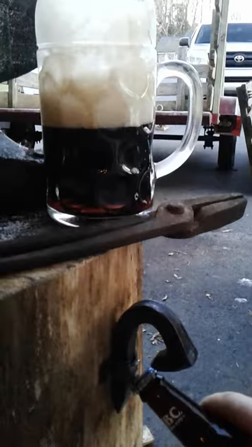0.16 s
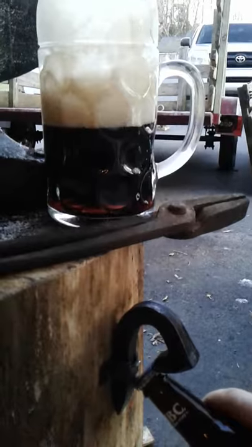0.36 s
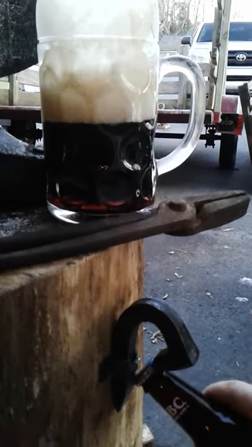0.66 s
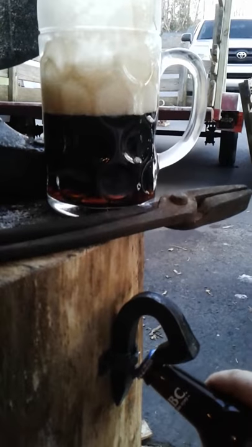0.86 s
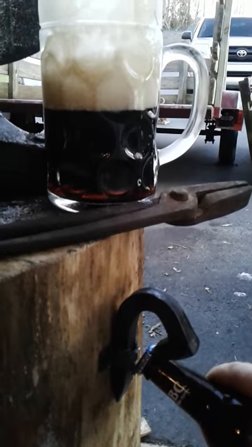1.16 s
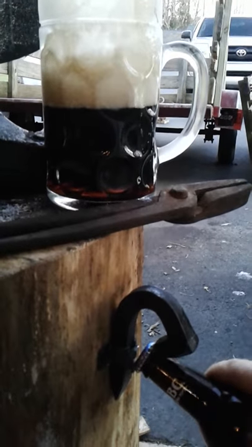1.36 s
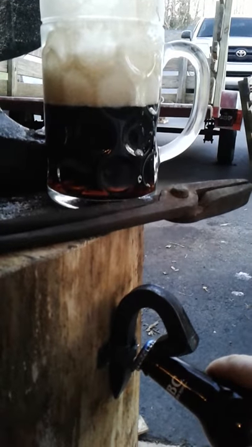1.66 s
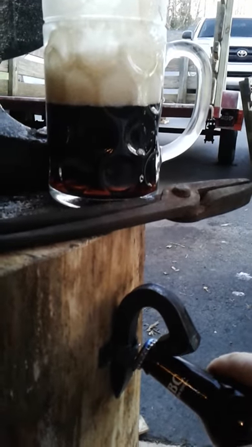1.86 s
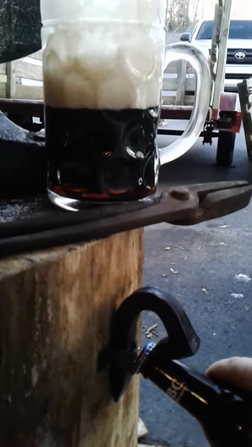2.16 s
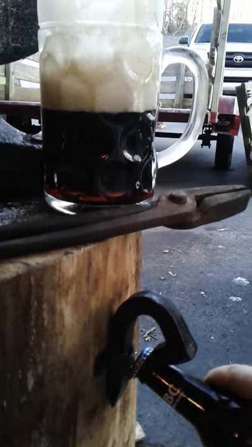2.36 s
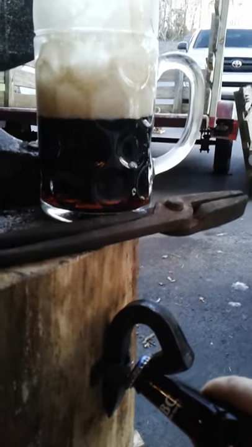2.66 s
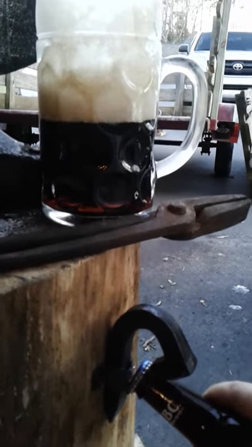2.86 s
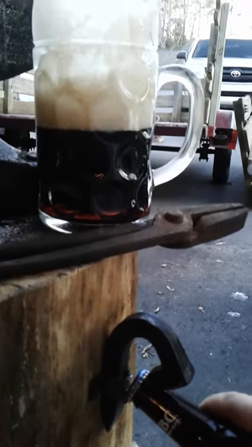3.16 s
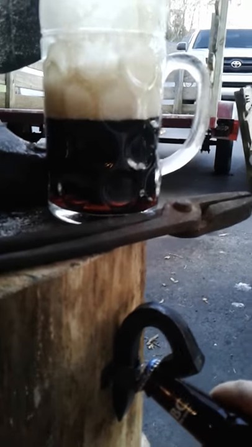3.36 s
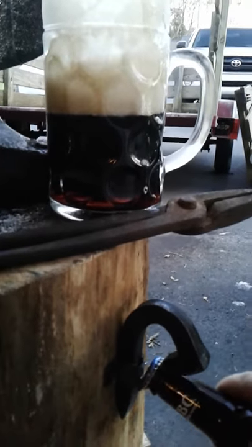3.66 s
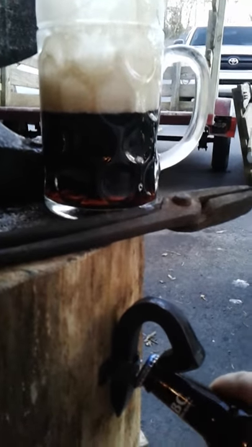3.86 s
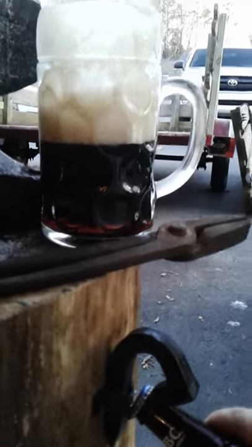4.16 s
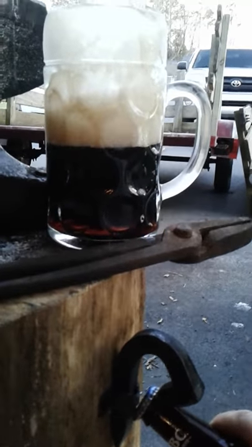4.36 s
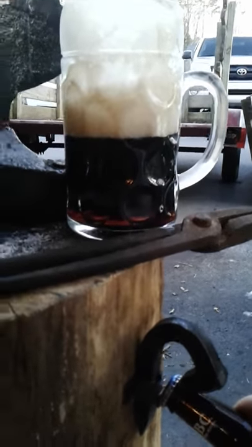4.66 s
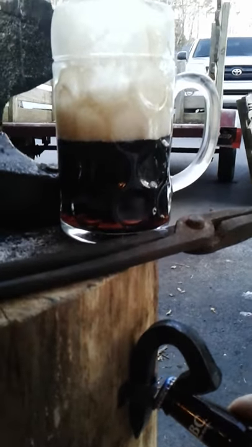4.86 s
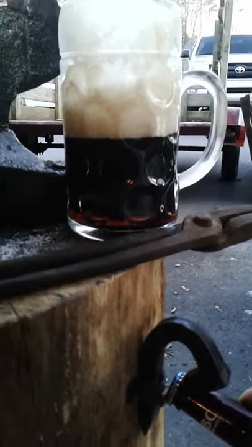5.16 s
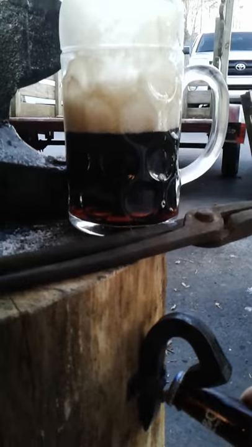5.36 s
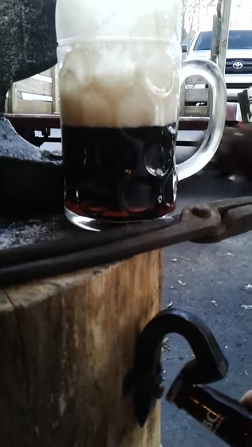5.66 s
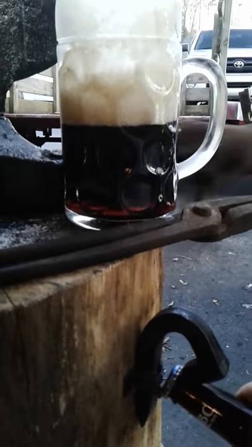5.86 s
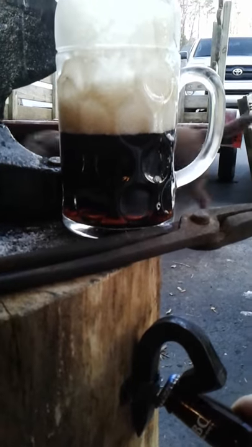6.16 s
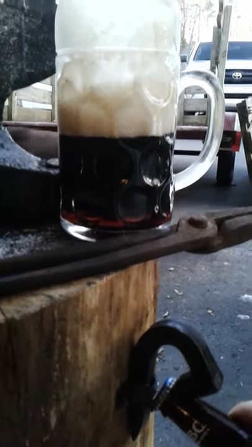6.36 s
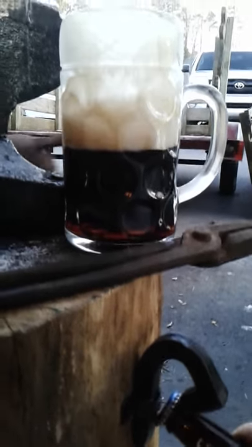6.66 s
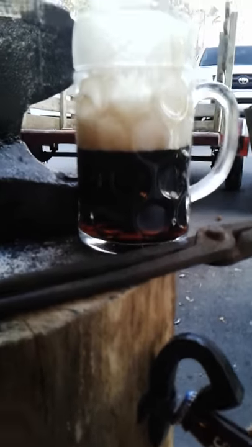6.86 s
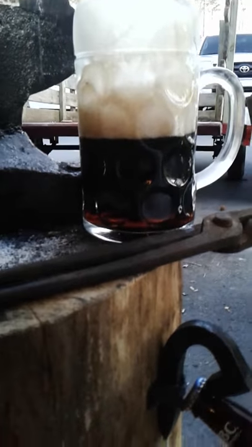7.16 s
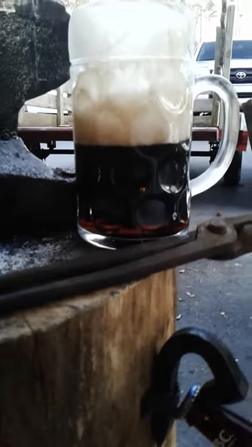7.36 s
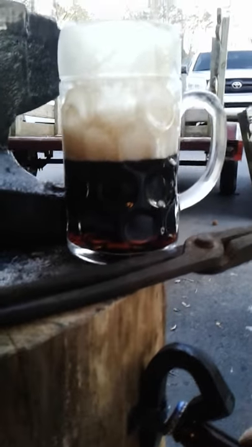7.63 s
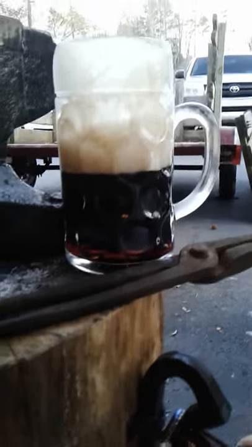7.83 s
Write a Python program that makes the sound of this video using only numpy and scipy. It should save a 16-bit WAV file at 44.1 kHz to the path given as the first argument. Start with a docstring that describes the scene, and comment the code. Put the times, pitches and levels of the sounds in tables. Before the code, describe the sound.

Close outdoor sound of a glass bottle being levered in a forged iron hook on a wooden post. Faint squeaks come first, then a bright clink, rough scraping and metal crunching with a woody shudder. Gas spits out in two sharp hisses, a cluster of clinks follows, and the cap lets go with a strong short pop and fading fizz over a quiet distant rumble.

```python
"""A crown cap is slowly levered off a glass bottle in a forged iron opener on a wooden post, outdoors.
Knocks of the bottle are gliding clinks, ringing iron and cap modes and a slow post; drags and crunches
are runs of tiny slips. The seal squeaks in wavering tones, gas escapes as shaped noise with two strong
spurts, and the cap lets go in a falling puff with a crack and hiss. Echoes, rumble and a rush lie behind."""
import sys
import numpy as np
from scipy import signal
from scipy.fft import rfft, irfft, next_fast_len
from scipy.io import wavfile

SR = 44100
rng = np.random.default_rng(int(sys.argv[2]) if len(sys.argv) > 2 else 0)


def store_wav(level_fs):
    """Save 16-bit WAV to argv[1]."""
    pcm = np.round(np.clip(np.atleast_2d(level_fs), -1, 1) * 32767)
    wavfile.write(sys.argv[1], SR, pcm.T.astype(np.int16))


N = 352473
TIME = np.arange(N) / SR
AGE = TIME[:SR]   # time since a blow, for one second


def from_db(db):
    """Decibels to gain."""
    return 10 ** (np.asarray(db) / 20)


def rms_one(x):
    """Scale to unit rms."""
    return x / np.sqrt(np.mean(x ** 2) + 1e-20)


def level(rows, axis=1):
    """Gain over time from a dB column; silent outside its rows."""
    rows = np.array(rows)
    return from_db(np.interp(TIME, rows[:, 0], rows[:, axis], left=-180, right=-180))


def dying(t60):
    """Exponential decay that loses 60 dB in t60 seconds."""
    return from_db(-60 * AGE / max(t60, .001))


def rising(time_s):
    """Soft onset with the given time constant in seconds."""
    return 1 - np.exp(-AGE / time_s)


def add(track, s, sound):
    """Mix a sound into a track from time s."""
    at = max(round(s * SR), 0)
    track[at:at + len(sound)] += sound[:N - at]


def coloured(x, colour):
    """Give a signal a spectrum that falls 24 dB per octave beyond its ends; rms 1."""
    hz, db = np.transpose(colour)
    octave = np.log2(np.maximum(np.fft.rfftfreq(len(x), 1 / SR), 1))
    outside = np.abs(octave - np.clip(octave, np.log2(hz[0]), np.log2(hz[-1])))
    gain_db = np.interp(octave, np.log2(hz), db) - 24 * outside
    return rms_one(irfft(rfft(x) * from_db(gain_db), len(x)))


def noise(colour, size=N):
    """Smooth noise of a given spectrum."""
    return coloured(rng.standard_normal(next_fast_len(size)), colour)[:size]


def flicker(rate, size=N):
    """Random wander through normally distributed points, rate of them per second."""
    knots = rng.standard_normal(size // 8)
    return np.interp(TIME[:size] * rate, np.arange(len(knots)), knots)


def slips(rate, size_db):
    """One second of tiny slips at random times and of random size."""
    happens = rng.random(SR) < rate / SR
    size = from_db(size_db * np.clip(rng.standard_normal(SR), -2, 2))
    return happens * rng.choice([-1, 1], SR) * size


def ringing(modes, scatter_db, detune):
    """Struck modes; the point of contact and the grip change their strength and pitch on every blow."""
    out = np.zeros(SR)
    for hz, db, t60 in modes:
        strength, shift, side = rng.uniform(-1, 1, 3)
        tone = np.sin(2 * np.pi * hz * (1 + detune * shift) * AGE)
        out += np.sign(side) * from_db(db + scatter_db * strength) * dying(t60) * tone
    return out


# bottle against the opener, levels before the layer trims:
# start_s [s], strength_db [dB], hardness [0-1], post_db [dB], clink_hz [Hz]
BOTTLE_KNOCKS = [(0.4811, -41, 0, -53.5, 1920), (0.527, -47, 0, -59, 1850), (1.886, -26, 0.83, -44, 2075),
                 (1.992, -38, 0.3, -49, 1840), (2.092, -43.5, 0, -48, 1930), (2.1982, -49, 0.99, -71, 1770),
                 (3.727, -42, 0.64, -43, 2094), (3.855, -48, .2, -63, 2330), (4.632, -56, 0.77, -60, 2070),
                 (4.667, -37.5, 1, -45, 2060), (4.851, -31, 1, -38.5, 2046), (4.882, -40, 0.2, -39.5, 2080),
                 (4.9576, -24, 0.85, -40.5, 2057), (5.049, -36.5, 0.69, -44.5, 1950),
                 (5.166, -42.5, 0.64, -46, 1890), (5.245, -28.5, 1, -42.5, 1995),
                 (5.414, -54, 0.2, -52, 1830), (5.674, -44.5, 0.5, -37.5, 2020), (5.782, -50, 0, -57, 2190),
                 (5.907, -43, .6, -38.5, 2040), (5.978, -25.5, 0.97, -40.5, 2044),
                 (6.114, -44, 0.1, -47.5, 2060), (6.151, -41.5, 0.54, -76, 2066),
                 (6.629, -32.5, .1, -43, 2080), (6.691, -60, .1, -51, 2000), (7.45, -58.5, 0.42, -74, 2160)]
# modes of the forged iron hook: pitch_hz [Hz], level_db [dB], t60_s [s]
IRON_MODES = [(666, 2, .07), (753, -5, 0.087), (840, -6.5, 0.0327), (1002.5, -0.5, 0.097),
              (1094, -8.5, .06), (1273, -4, 0.17), (1416, -2, 0.099), (1594, 2.5, 0.063),
              (1860, -5, 0.0556), (1910, -10.5, .15), (2220, -20.5, .26), (2450, -17.5, 0.021)]
# modes of the thin steel cap: pitch_hz [Hz], level_db [dB], t60_s [s]
CAP_MODES = [(2640, 2.5, 0.0577), (3030, -2, 0.09), (3184, 2, 0.12), (3960, -2, .05), (4160, 2.5, 0.09),
             (4280, 0.5, 0.12), (4680, -3, 0.05), (4960, -5.5, 0.073), (5020, 0, 0.15), (5650, -7.5, .04),
             (6400, -3.5, 0.085)]
# the post's two slow resonances, thud then hum: pitch_hz [Hz], t60_s [s]
POST_RESONANCES = [(176, 0.11), (283, 0.14)]
# the post thuds while the bottle is wedged in the hook and hums when it sits loosely: (thud dB, hum dB)
WEDGED_FROM_S, WEDGED_UNTIL_S = 1.0, 5.2
WEDGED_DB, LOOSE_DB = (0, -6.5), (-10.5, -0.5)
# a soft contact clinks and ticks this much less than a hard one
SOFT_CLINK_LOSS_DB, SOFT_TICK_LOSS_DB = 33, 9
TICK_GROWTH = 1.42   # dB of edge tick per dB of strength
CLINK_BEND, CLINK_BEND_S = .04, .004   # the clink starts sharp by this share and settles


def knocks(hold_s=0.0076, damp_t60=0.069, clink_db=7.5, body_db=-13.5, thud_db=5.5, tick_db=-15.0,
           cap_db=-21.0, clack_db=-7.5, chatter_db=3.0, wobble_db=3.0, lowest_hz=110):
    """Each contact clinks until the grip damps it, rings the iron, thuds in the post and ticks at the cap's edge."""
    clack_colour = [(250, 7), (450, -11), (700, 10.5), (1700, 4.5), (2400, -6.0), (3600, -22.0)]
    edge_colour = [(3000, -10.5), (3600, -10.0), (4300, 0), (5800, -2.5), (6500, 0.5), (8600, 8.5),
                   (11000, -35.5), (15500, -17.5)]
    out = np.zeros(N)
    grip = np.minimum(1, from_db(-60 * (AGE - hold_s) / damp_t60))
    strongest = max(row[1] for row in BOTTLE_KNOCKS)
    for s, strength, hardness, post_db, hz in BOTTLE_KNOCKS:
        softness = 1 - hardness
        clink = strength + clink_db - SOFT_CLINK_LOSS_DB * softness
        tick = strongest + TICK_GROWTH * (strength - strongest) - SOFT_TICK_LOSS_DB * softness

        # glass chatters on iron, so the clink is slightly rough
        pitch = hz * (1 + CLINK_BEND * np.exp(-AGE / CLINK_BEND_S))
        tone = np.sin(2 * np.pi * np.cumsum(pitch) / SR) * grip * dying(0.204) * rising(0.00035)
        tone = tone * from_db(chatter_db * flicker(600, size=SR))

        clack = noise(clack_colour, size=SR) * dying(0.082) * rising(0.000507)
        iron = from_db(body_db) * ringing(IRON_MODES, scatter_db=0.5, detune=.015) + from_db(clack_db) * clack

        edge = noise(edge_colour, size=SR) * dying(0.034)
        steel = ringing(CAP_MODES, scatter_db=4.0, detune=.015)
        cap = from_db(cap_db) * steel * grip + from_db(tick_db) * edge

        # the heavy post takes a few milliseconds to get going and rings unevenly
        shares = WEDGED_DB if WEDGED_FROM_S < s < WEDGED_UNTIL_S else LOOSE_DB
        slow = [(post_hz, post_db + share + thud_db, t60)
                for (post_hz, t60), share in zip(POST_RESONANCES, shares)]
        post = ringing(slow, scatter_db=3.0, detune=.04) * rising(0.0078)
        post = post * from_db(wobble_db * flicker(60, size=SR))

        add(out, s, from_db(clink) * tone + from_db(strength) * iron + post + from_db(tick) * cap)
    # the knocks carry no deep bass
    return signal.sosfilt(signal.butter(2, lowest_hz, "high", fs=SR, output="sos"), out)


# the cap's rim and skirt ping: start_s [s], pitch_hz [Hz], level_db [dB], t60_s [s]
CAP_PINGS = [(.482, 4250, -74.5, .55), (.482, 1466, -59, 0.55), (1.886, 2640, -24, 0.071),
             (1.888, 2630, -56, 0.6), (1.886, 5050, -41.5, 0.046), (2.332, 5880, -43.5, 0.3),
             (2.33, 8940, -51, 0.25), (2.33, 14950, -59, 0.24), (6.135, 8870, -48, 0.15),
             (6.135, 14950, -59, 0.32)]


def pings(beat_hz=13, beat=0.19):
    """Thin steel snaps to a new shape and rings at one pitch; the cap is not quite round, so the ring beats."""
    out = np.zeros(N)
    for s, hz, db, t60 in CAP_PINGS:
        pair = np.sin(2 * np.pi * hz * AGE) + beat * np.sin(2 * np.pi * (hz + beat_hz) * AGE)
        add(out, s, from_db(db) * dying(t60) * pair / (1 + beat) * rising(0.002))
    return out


# the cap's teeth drag over the iron: start_s [s], level_db [dB], t60_s [s], rasp_hz [Hz]
TEETH_SCRAPES = [(.78, -59.5, 0.29, 1300), (1.112, -60, 0.27, 1390), (2.182, -49.5, 0.059, 1310),
                 (2.201, -43, 0.046, 1780), (2.219, -65, 0.62, 1820), (2.516, -30, .075, 1690),
                 (2.519, -36.5, .14, 900), (2.541, -34.5, 0.22, 1520), (2.7266, -43.5, 0.11, 1830),
                 (2.759, -38, .12, 2520), (2.791, -29, .16, 1800), (2.84, -37.5, 0.36, 1430)]
# spectrum of the drag: pitch_hz [Hz], level_db [dB per Hz]
DRAG_COLOUR = [(150, -8), (260, 4.5), (480, -9.5), (850, 2.5), (1150, -3.5), (1700, 1.5), (2300, -6),
               (2900, -17), (4100, -29), (6000, -20), (8400, -17), (10500, -38)]


def scrapes(slips_per_s=2200, slip_db=2.0, rasp_q=3.2, rasp_db=-5.0, drag_db=-0.5):
    """Each drag is a dying run of tiny slips that excite one rasping resonance."""
    out = np.zeros(N)
    for s, db, t60, hz in TEETH_SCRAPES:
        run = slips(slips_per_s, slip_db)
        near_rasp = coloured(run, [(hz / 2, 0), (hz * 2, 0)])
        rasp = rms_one(signal.lfilter(*signal.iirpeak(hz, rasp_q, fs=SR), near_rasp))
        drag = from_db(drag_db) * coloured(run, DRAG_COLOUR) + from_db(rasp_db) * rasp
        add(out, s, from_db(db) * dying(t60) * rising(0.0021) * drag)
    return out


# the cap's crimp buckles in bright crunches: start_s [s], level_db [dB], t60_s [s]
CRIMP_CRUNCHES = [(0.482, -51, 0.032), (2.492, -45, 0.024), (2.517, -48, 0.084), (2.759, -34, 0.19),
                  (2.793, -38, 0.19), (5.673, -43, .035)]
# spectrum of a crunch: pitch_hz [Hz], level_db [dB per Hz]
CRIMP_COLOUR = [(2000, -0.5), (2600, 3.5), (3600, -14.5), (5000, -3.5), (6500, -0.5), (8500, 7),
                (10500, -24.5), (15500, -20)]


def crunches(snaps_per_s=3000, snap_db=3.0):
    """Thin steel gives way in a sudden, dense run of snaps."""
    out = np.zeros(N)
    for s, db, t60 in CRIMP_CRUNCHES:
        snaps = coloured(slips(snaps_per_s, snap_db), CRIMP_COLOUR)
        add(out, s, from_db(db) * dying(t60) * snaps)
    return out


# spectrum of the pop's crack: pitch_hz [Hz], level_db [dB per Hz]
POP_CRACK_COLOUR = [(500, -4.5), (1300, -4), (2200, -0.5), (3300, -14.5), (4000, -27), (5150, -1),
                    (6600, -14.5), (8600, -0.5), (9500, -7), (11300, -35.5), (14700, -15.5), (16000, -20)]
# spectrum of the hiss that follows the pop: pitch_hz [Hz], level_db [dB per Hz]
POP_HISS_COLOUR = [(500, -7), (1000, -7.5), (1800, -6.5), (2400, -1), (3200, -8), (3900, -21.5), (5200, -5),
                   (7000, -12.5), (8400, 2.5), (9600, -6.5), (11300, -34), (15000, -17.5)]
POP_S = 6.6285


def pop(start_hz=285, end_hz=55, slow_s=0.0034, crack_db=-14.5, tail_db=-38.5,
        neck_hz=5200, neck_db=-40.5, neck_t60=0.33):
    """The pressure lets go: one steep puff that swings ever slower, a crack, a hissing tail and a ring in the neck."""
    out = np.zeros(N)
    hz = end_hz + (start_hz - end_hz) * np.exp(-AGE / slow_s)
    swing = from_db(-6.5) * dying(0.01) + from_db(-10.0) * dying(0.092)
    puff = swing * np.cos(2 * np.pi * np.cumsum(hz) / SR) * rising(.0001)
    crack = from_db(crack_db) * dying(0.016) * noise(POP_CRACK_COLOUR, size=SR)
    tail = from_db(tail_db) * dying(0.5) * noise(POP_HISS_COLOUR, size=SR)
    breath = noise([(4800, 0.0055), (5600, 0.0023)], size=SR)
    neck = rms_one(signal.lfilter(*signal.iirpeak(neck_hz, 30, fs=SR), breath))
    add(out, POP_S, puff + crack + tail + from_db(neck_db) * dying(neck_t60) * neck)
    return out


OPENING_DB_PER_S = 697
SWELL_DB_PER_S = 71.5   # the jet grows until the middle of its hold, then eases


def spurt(s, hold_s, db, closing_db_per_s):
    """Flow of one jet: the gap opens fast, swells and eases while held, and closes more slowly."""
    since, left = TIME - s, s + hold_s - TIME
    swell = SWELL_DB_PER_S * np.maximum(np.minimum(since, left), 0)
    opening = OPENING_DB_PER_S * np.minimum(since, 0)
    closing = closing_db_per_s * np.minimum(left, 0)
    return from_db(db + swell + opening + closing)


# gas through the seal as it starts to leak, between the spurts and as the pressure runs down:
# time_s [s], level_db [dB]
SEAL_SEEP = [(0.6, -94), (1.37, -76), (1.94, -79), (2.08, -74), (2.22, -60), (2.36, -63), (2.6, -66),
             (2.77, -51.5), (3.0, -55), (3.35, -58.5), (3.814, -50), (4.03, -57), (4.42, -59), (4.76, -63),
             (5.45, -71), (6.09, -67), (6.7, -65), (7.28, -83.5), (7.95, -86)]
# the cap lifts and lets out a jet, its level before the swell:
# start_s [s], hold_s [s], level_db [dB], closing [dB per s]
GAS_SPURTS = [(2.65, 0.017, -55.5, 200), (2.69, 0.057, -51.5, 200.5), (3.075, 0.15, -26.5, 324.5),
              (4.122, 0.088, -26, 253)]
# spectrum of the wet seep: pitch_hz [Hz], level_db [dB per Hz]
WET_COLOUR = [(1500, -5), (2500, -9.5), (4000, -15.5), (5200, -8.5), (6300, -6), (7500, -5.5), (8600, 3),
              (9400, -12.5), (10500, -27.5), (12000, -33), (14000, -22), (15700, -18)]
# spectrum of the jet: pitch_hz [Hz], level_db [dB per Hz]
JET_COLOUR = [(400, -37.5), (2500, -27.5), (4200, -34.5), (6000, -20), (6800, -11), (7500, -1), (8500, 3),
              (9300, -10), (10100, -12), (11300, -34), (12500, -32), (13700, -24), (14500, -9),
              (15700, -19)]


def gas(waver_db=0.8):
    """A wet gap seeps and sputters; when the cap lifts, a brighter jet takes over."""
    seep = level(SEAL_SEEP) * from_db(waver_db * flicker(47))
    jet = sum(spurt(*row) for row in GAS_SPURTS) * from_db(1.5 * flicker(90))
    # droplets in the gap chop the flow many hundred times a second
    fizz = rms_one(noise(WET_COLOUR) * from_db(2.2 * flicker(900)))
    hiss = rms_one(noise(JET_COLOUR) * from_db(2.1 * flicker(1400)))
    return seep * fizz + jet * hiss


# the larger spits of foam at the rim: start_s [s], level_db [dB], t60_s [s]
FOAM_SPITS = [(1.293, -61, 0.044), (5.605, -52.5, .067), (5.945, -56, 0.089), (5.874, -58, .15),
              (6.118, -49.5, .14), (6.296, -56.5, .085), (6.338, -51.5, .069), (7.03, -65, 0.3),
              (7.845, -67.5, 0.111)]
SMALL_SPITS_PER_S, SMALL_SPIT_DB, SMALL_SPIT_T60_S = 4, 1, .04   # level relative to the seep


def spits():
    """Foam bursts at the rim in short, bright spits; the small ones come at random and grow with the seep."""
    out = np.zeros(N)
    for s, db, t60 in FOAM_SPITS:
        add(out, s, from_db(db) * dying(t60) * noise(WET_COLOUR, size=SR))
    bursts = (rng.random(N) < SMALL_SPITS_PER_S / SR) * level(SEAL_SEEP)
    small = signal.fftconvolve(bursts, dying(SMALL_SPIT_T60_S))[:N]
    return out + from_db(SMALL_SPIT_DB) * small * noise(WET_COLOUR)


def seal_tone(hz, size, waver=.003, width_hz=130, breathy=0.99):
    """A thin, unsteady tone blurred by turbulence."""
    phase = 2 * np.pi * np.cumsum(hz * (1 + waver * flicker(100, size=size))) / SR
    blur = flicker(2 * width_hz, size=size) * np.sin(phase)
    blur = blur + flicker(2 * width_hz, size=size) * np.cos(phase)
    return np.sin(phase) + breathy * blur


# the long whistle while the seal is strained: time_s [s], pitch_hz [Hz], level_db [dB]
SEAL_WHISTLE = [(1.17, 9900, -88), (1.2, 10210, -70.5), (1.314, 10080, -59.5), (1.606, 10764, -65.5),
                (1.648, 10402, -61.5), (1.89, 10600, -82)]
# short squeaks of the seal: start_s [s], pitch_hz [Hz], level_db [dB], t60_s [s]
SEAL_SQUEAKS = [(.41, 9900, -81, .6), (.52, 10250, -69, .22), (.725, 10100, -67.5, 0.3),
                (1.467, 6670, -54, 0.26), (1.471, 3860, -75, .3), (1.475, 7660, -64, 0.28),
                (1.54, 7000, -54.5, 0.22)]
SQUEAK_RISE_S = 0.0067
SQUEAK_WAVER = .009   # the short squeaks wander by this share of their pitch


def squeaks():
    """The strained seal gives one long, gliding whistle and short squeaks that die around a set pitch."""
    times, pitch, _ = np.transpose(SEAL_WHISTLE)
    out = level(SEAL_WHISTLE, axis=2) * seal_tone(np.interp(TIME, times, pitch), size=N)
    for s, hz, db, t60 in SEAL_SQUEAKS:
        tone = seal_tone(hz, size=SR, waver=SQUEAK_WAVER)
        add(out, s, from_db(db) * dying(t60) * rising(SQUEAK_RISE_S) * tone)
    return out


# the post shudders each time the cap gives a little: start_s [s], level_db [dB], t60_s [s]
POST_JOLTS = [(2.529, -47, 0.78), (2.75, -45.5, 0.45), (2.789, -38.5, 0.47), (2.84, -30.5, 0.51),
              (2.995, -35.5, .45), (3.154, -46, 0.51)]
# spectrum of the shudder: pitch_hz [Hz], level_db [dB per Hz]
SHUDDER_COLOUR = [(18, -43), (30, -11), (64, -2.5), (152, 3.5), (187, -11), (219, -5), (436, -18.5),
                  (700, -19), (910, -52.5), (1540, -120)]
JOLT_RISE_S = 0.0059


def shudders(lumpy_db=1.5):
    """Each jolt sets off a lumpy, dying rumble in the post."""
    out = np.zeros(N)
    for s, db, t60 in POST_JOLTS:
        lumps = from_db(lumpy_db * flicker(70, size=SR))
        rumble = rms_one(noise(SHUDDER_COLOUR, size=SR) * lumps)
        add(out, s, from_db(db) * dying(t60) * rising(JOLT_RISE_S) * rumble)
    return out


# spectrum of the slide's rub and of the outdoor rush: pitch_hz [Hz], level_db [dB per Hz]
RUSH_COLOUR = [(250, -7), (450, 4.5), (900, 3.5), (1600, 0), (2300, -3.5), (3500, -12), (6000, -19),
               (9000, -19.5), (11500, -30), (15500, -20)]
# the bottle slides slowly along the iron between the spurts: middle, half width and level
SLIDE_S, SLIDE_WIDTH_S, SLIDE_DB = 3.75, 0.32, -61


def slide(uneven_db=3.5):
    """A soft rub that swells and fades."""
    swell = np.exp(-((TIME - SLIDE_S) / SLIDE_WIDTH_S) ** 2)
    return from_db(SLIDE_DB + uneven_db * flicker(30)) * swell * noise(RUSH_COLOUR)


# soft low blips: middle_s [s], pitch_hz [Hz], level_db [dB]
LOW_BLIPS = [(3.372, 454, -50), (3.646, 463, -52.5), (3.975, 386, -43.5)]


def blips(width_s=0.0046, fall=30.0):
    """Short, soft tones that slide down."""
    out = np.zeros(N)
    for s, hz, db in LOW_BLIPS:
        since = TIME - s
        tone = np.sin(2 * np.pi * hz * since * (1 - fall * since))
        out += from_db(db) * np.exp(-(since / width_s) ** 2) * tone
    return out


def yard(x, wet_db=-18.0, t60=0.4, first_s=0.024):
    """Adds dull scattered echoes from things standing nearby, as a dying noise response."""
    echo_colour = [(150, -4.5), (600, -3.5), (2200, -9), (5000, -3.0), (12000, -11.0)]
    echoes = noise(echo_colour, size=SR) * dying(t60) * (AGE > first_s)
    return x + from_db(wet_db) * signal.fftconvolve(x, echoes / np.linalg.norm(echoes))[:N]


# the outdoor background fades in, holds, sinks after the pop and comes up again:
# time_s [s], level_db [dB relative to the hold]
OUTDOOR_LEVEL = [(.4, -31), (.465, -16), (.5, -0.5), (6.65, 0), (7.0, -7.5), (7.65, -13), (8.0, -5.5)]
# spectrum of the distant rumble: pitch_hz [Hz], level_db [dB per Hz]
DISTANT_COLOUR = [(15, -34.5), (25, -13.5), (27, -21), (75, -1), (112, 1), (207, -3), (321, -9),
                  (392, -13.5), (600, -24.5), (780, -44), (1320, -120)]
RUMBLE_FOLLOWS = 0.89   # the rumble's share of the background's swing in dB


def air(rumble_db=-61.5, rustle_db=-68.0):
    """A distant rumble and a soft, flickering outdoor rush, both of shaped noise."""
    outdoors = level(OUTDOOR_LEVEL)
    rumble = from_db(rumble_db) * outdoors ** RUMBLE_FOLLOWS * noise(DISTANT_COLOUR)
    rush = from_db(rustle_db + 3.3 * flicker(28)) * outdoors * noise(RUSH_COLOUR)
    return rumble + rush


def scene():
    """Bottle, cap and gas close by, the yard behind."""
    contacts = knocks() + pings() + scrapes() + crunches() + shudders() + slide()
    echoing = yard(contacts + squeaks() + spits())
    return (echoing + gas() + blips() + pop() + air())[None]


def record(dry):
    """The top is cut steeply above 16 kHz."""
    return signal.sosfilt(signal.ellip(10, .1, 80, 16000, fs=SR, output="sos"), dry)


dry = scene()
out = record(dry)
store_wav(out)
```